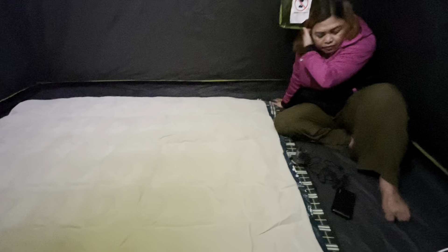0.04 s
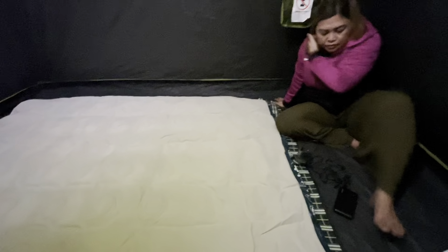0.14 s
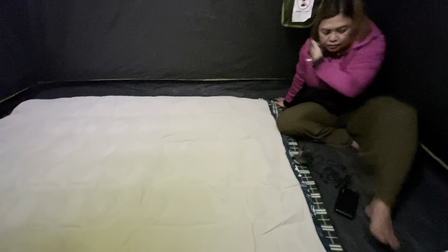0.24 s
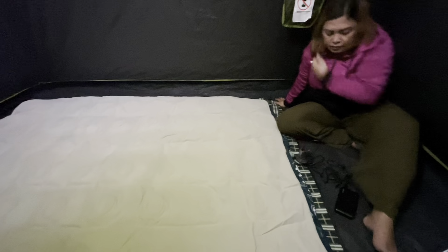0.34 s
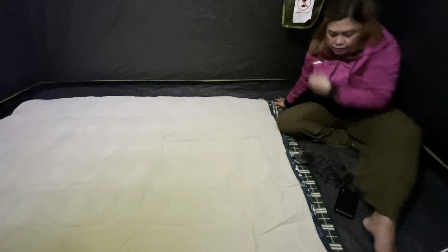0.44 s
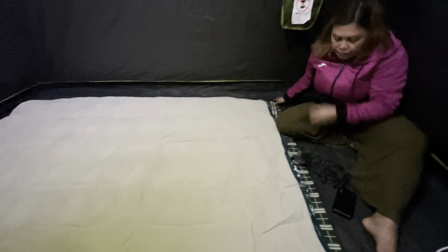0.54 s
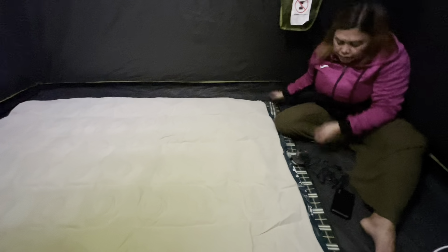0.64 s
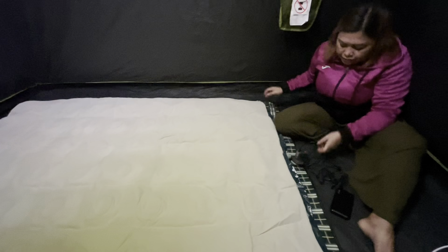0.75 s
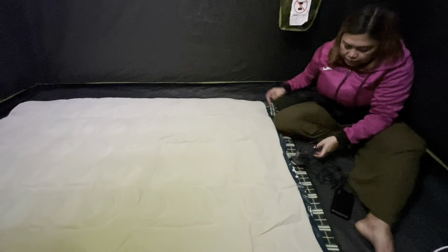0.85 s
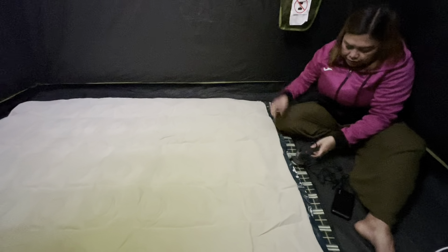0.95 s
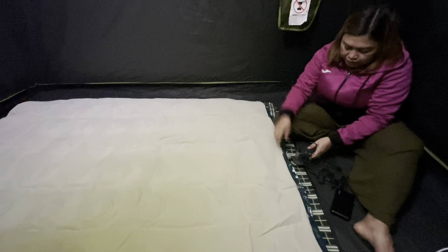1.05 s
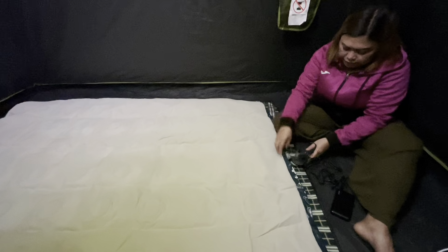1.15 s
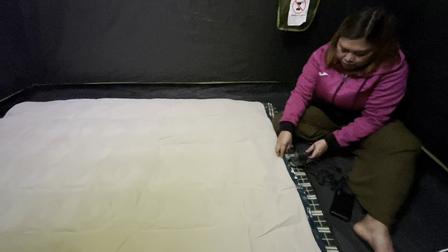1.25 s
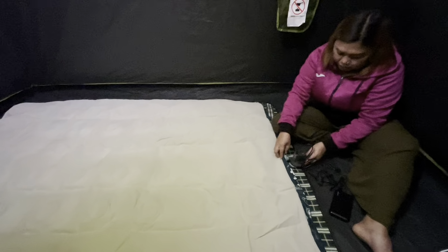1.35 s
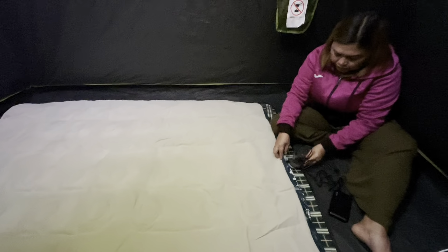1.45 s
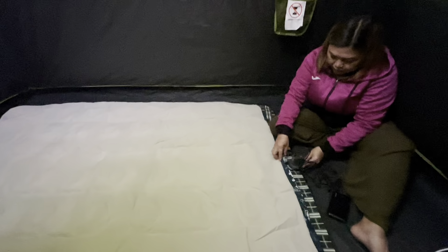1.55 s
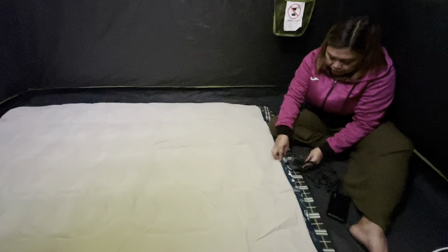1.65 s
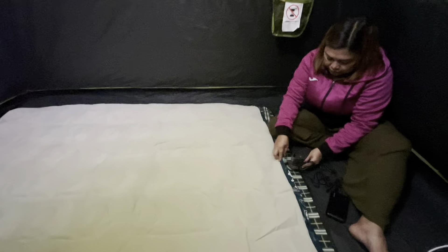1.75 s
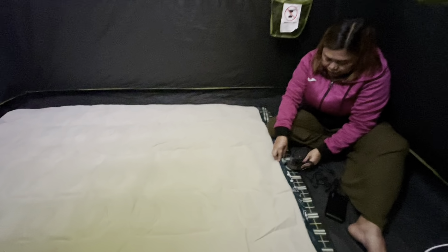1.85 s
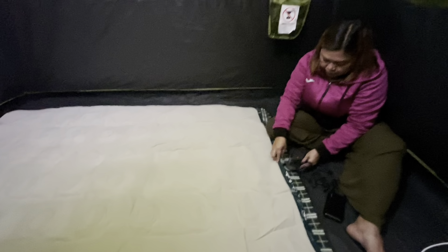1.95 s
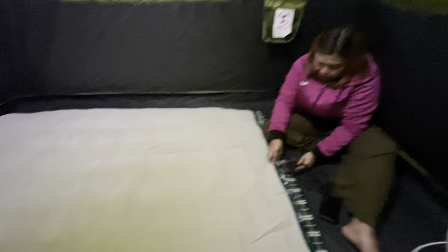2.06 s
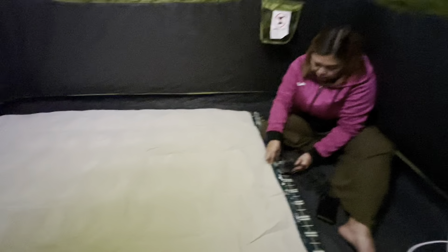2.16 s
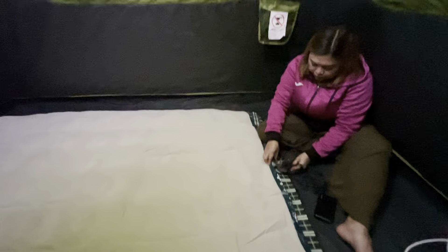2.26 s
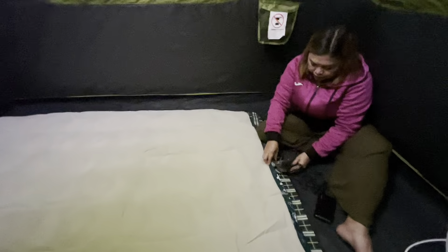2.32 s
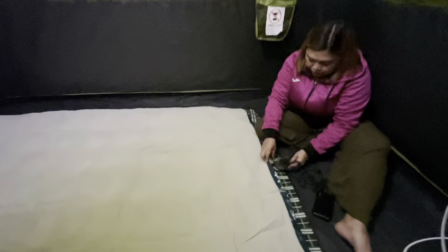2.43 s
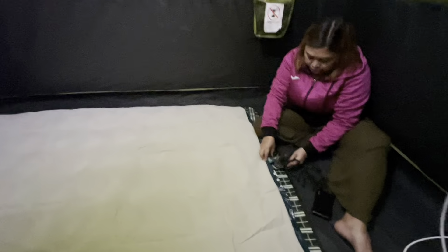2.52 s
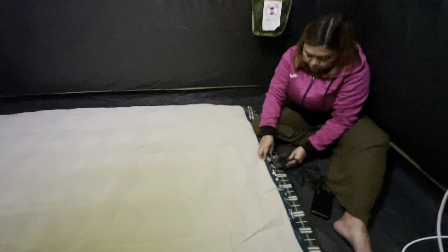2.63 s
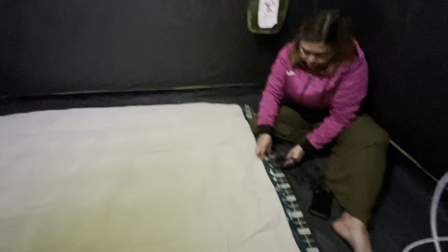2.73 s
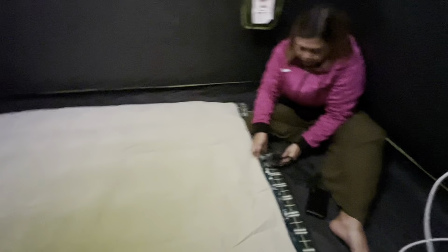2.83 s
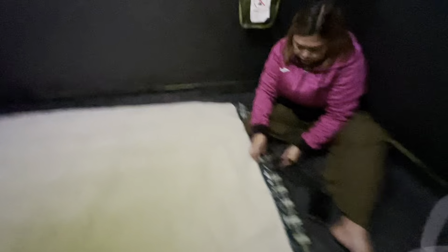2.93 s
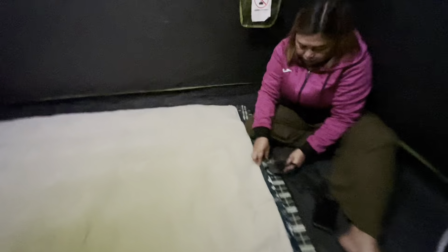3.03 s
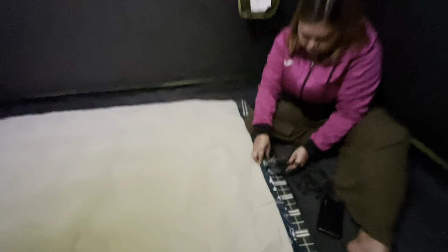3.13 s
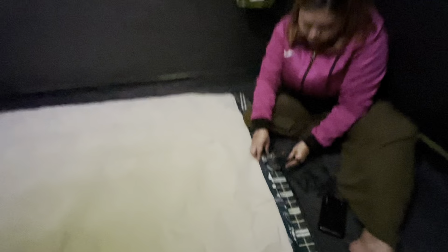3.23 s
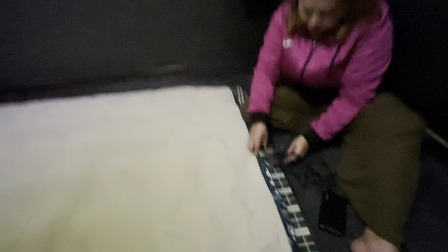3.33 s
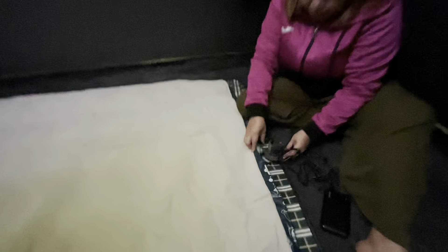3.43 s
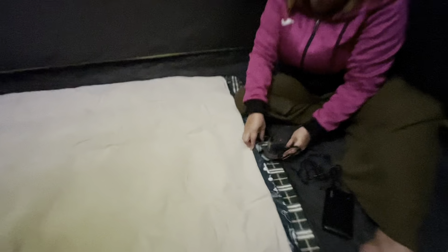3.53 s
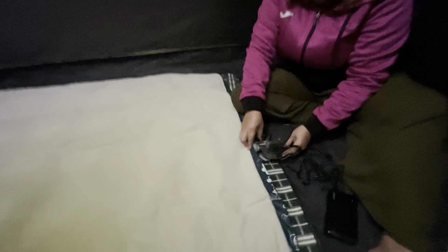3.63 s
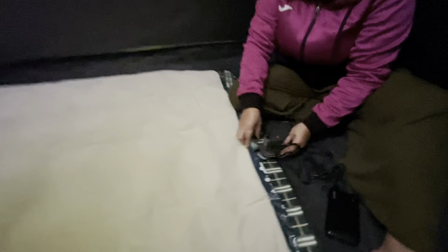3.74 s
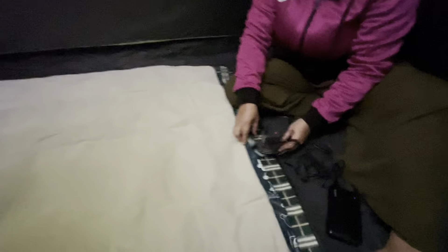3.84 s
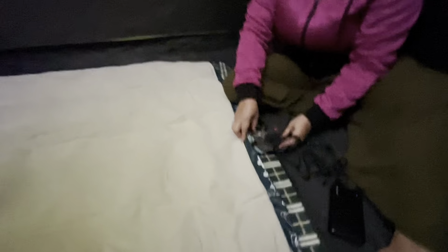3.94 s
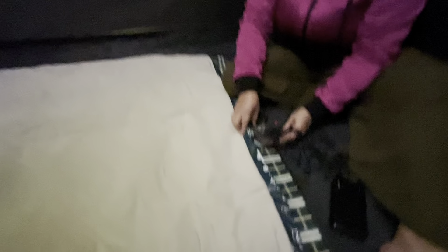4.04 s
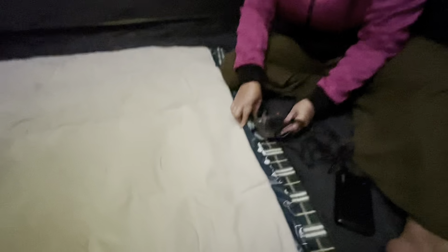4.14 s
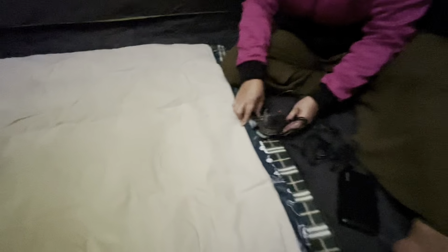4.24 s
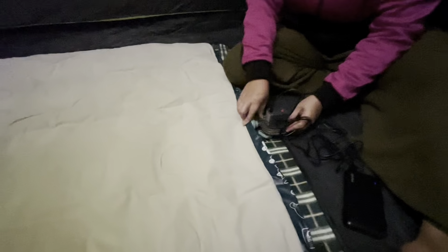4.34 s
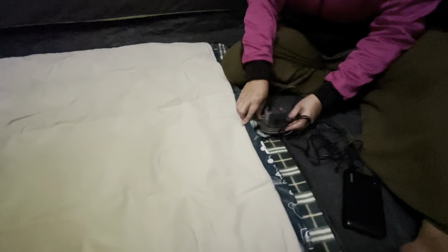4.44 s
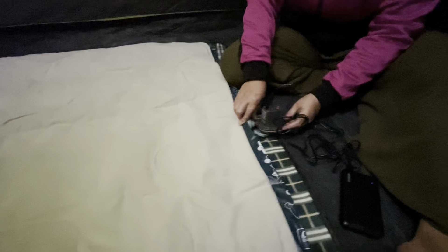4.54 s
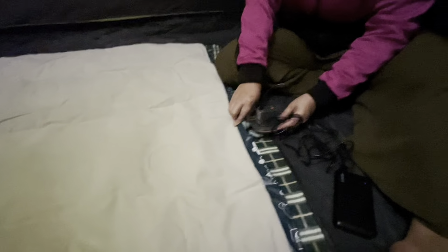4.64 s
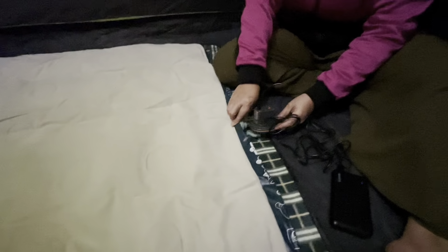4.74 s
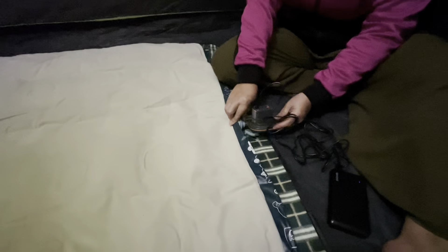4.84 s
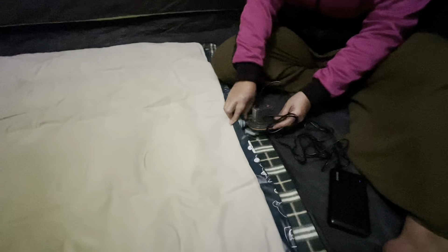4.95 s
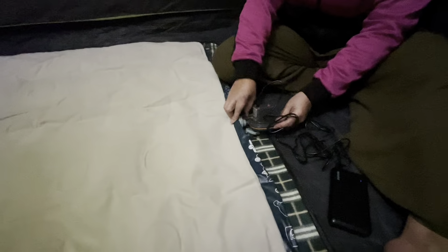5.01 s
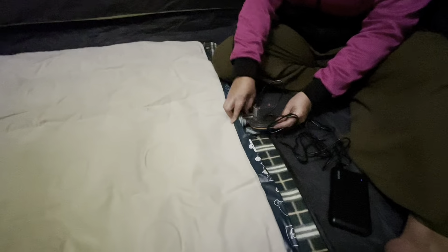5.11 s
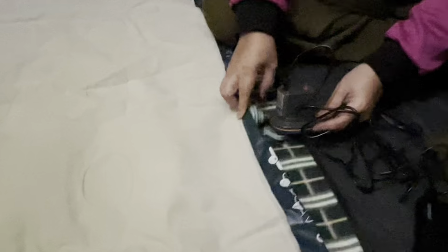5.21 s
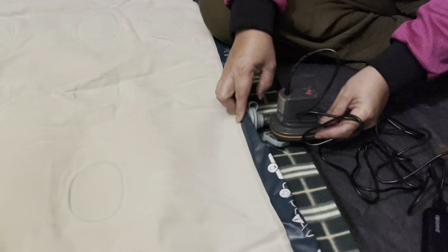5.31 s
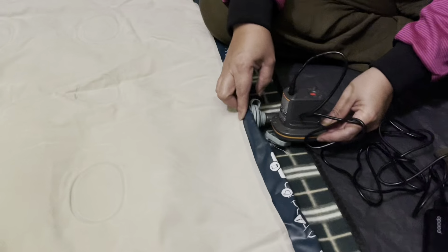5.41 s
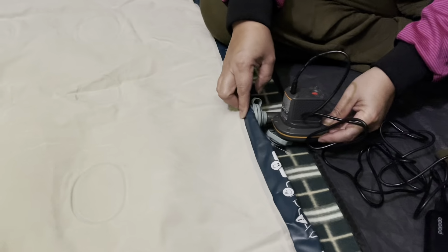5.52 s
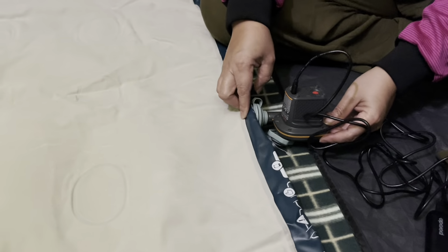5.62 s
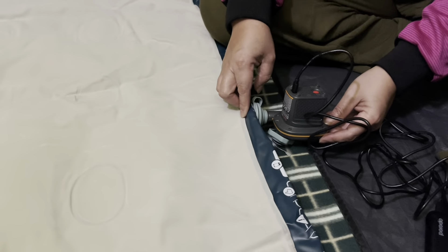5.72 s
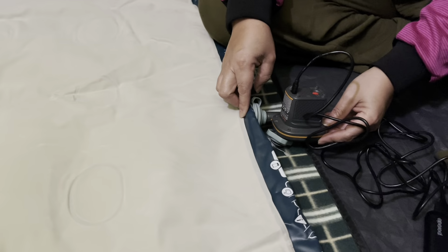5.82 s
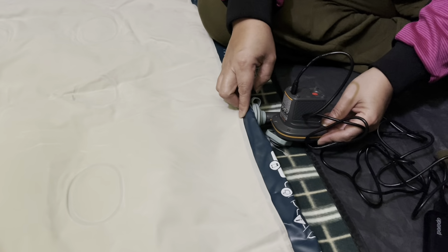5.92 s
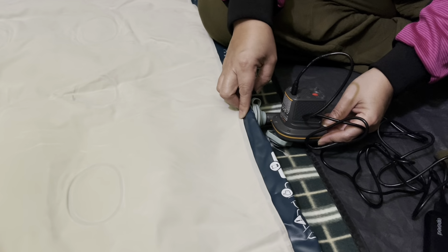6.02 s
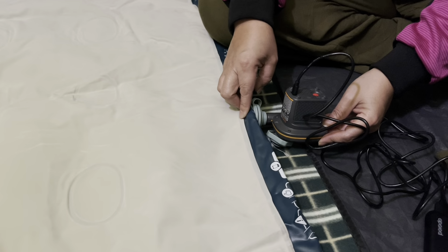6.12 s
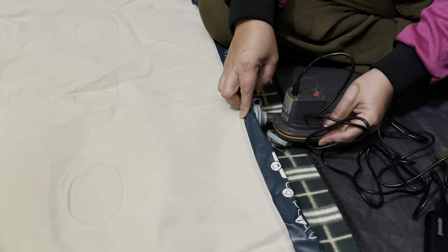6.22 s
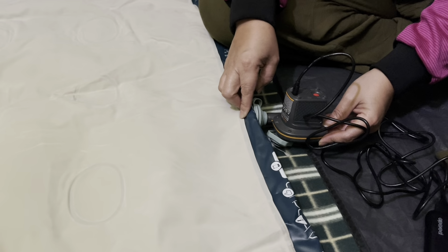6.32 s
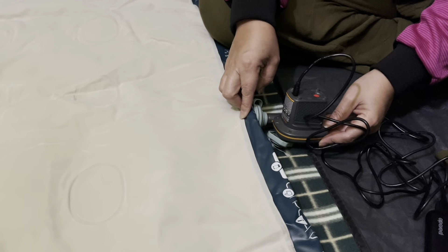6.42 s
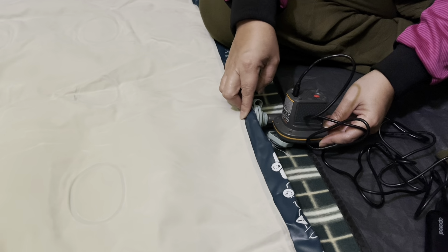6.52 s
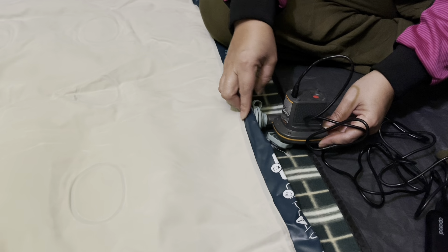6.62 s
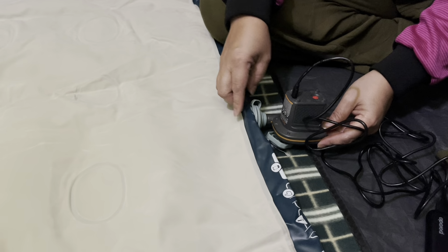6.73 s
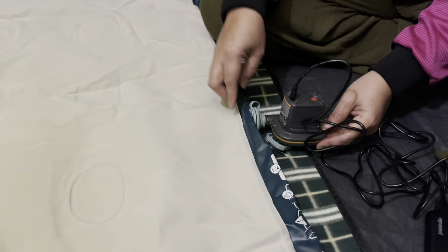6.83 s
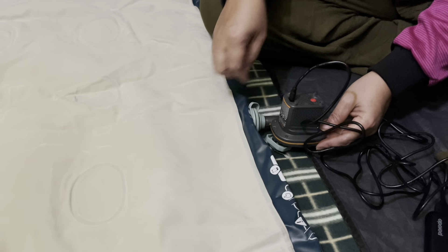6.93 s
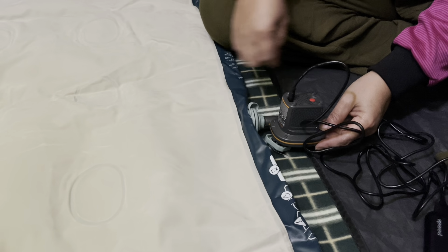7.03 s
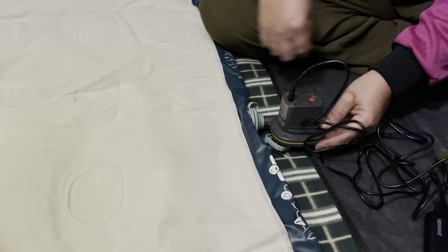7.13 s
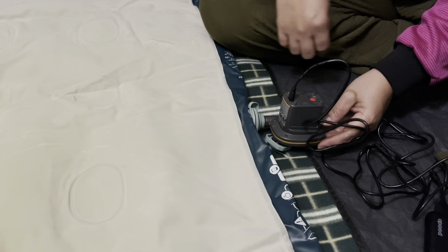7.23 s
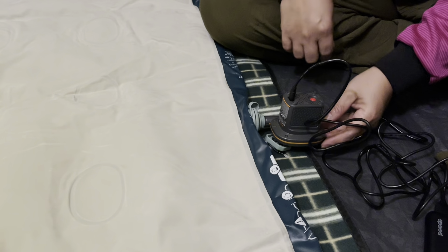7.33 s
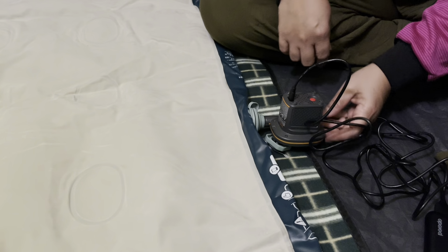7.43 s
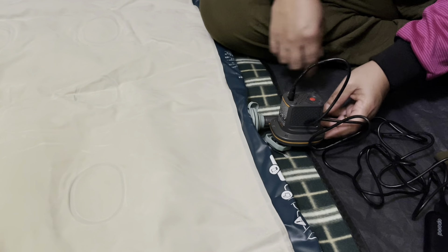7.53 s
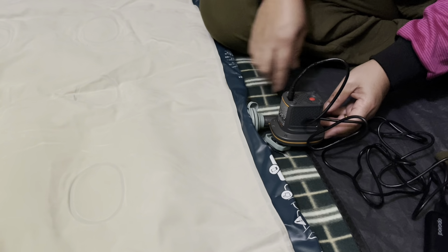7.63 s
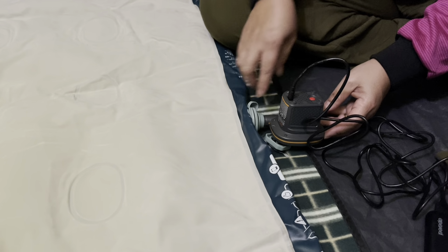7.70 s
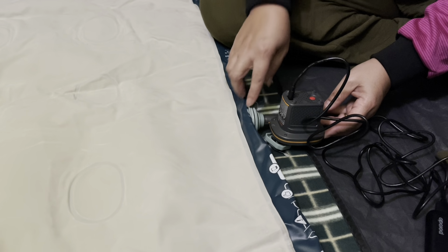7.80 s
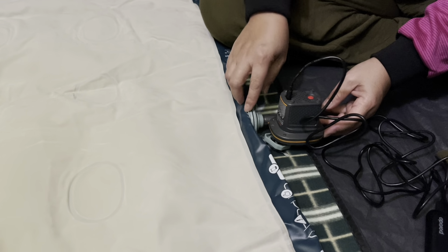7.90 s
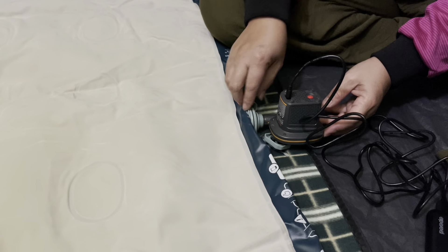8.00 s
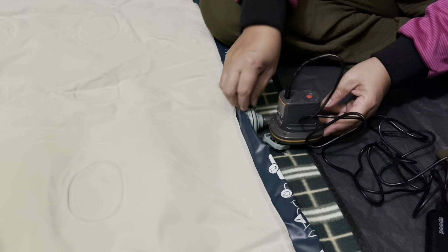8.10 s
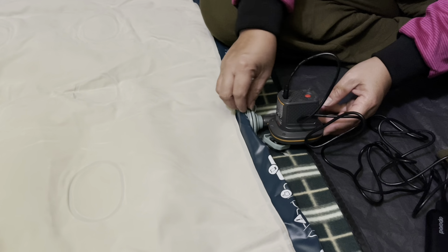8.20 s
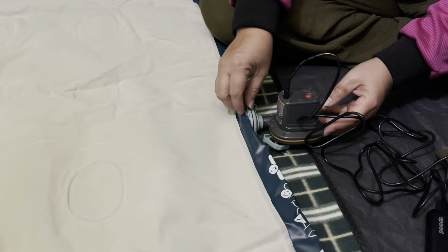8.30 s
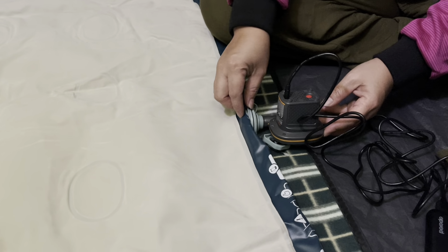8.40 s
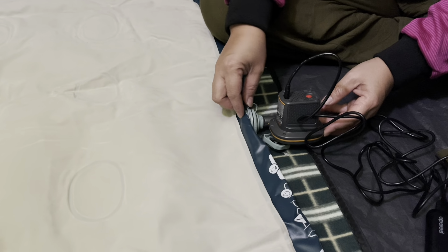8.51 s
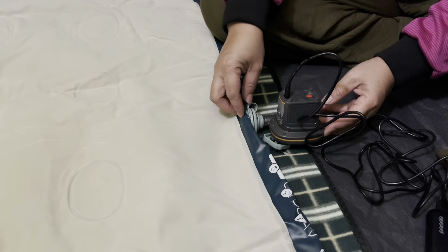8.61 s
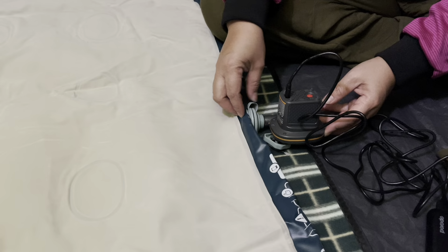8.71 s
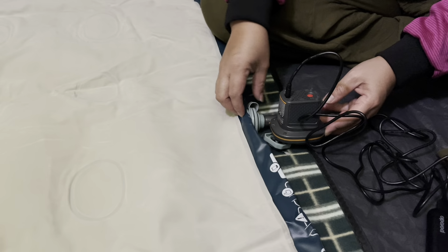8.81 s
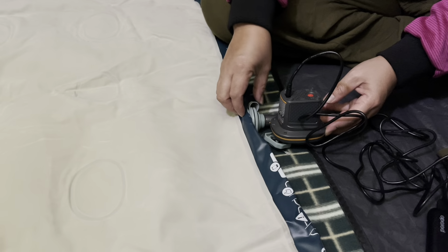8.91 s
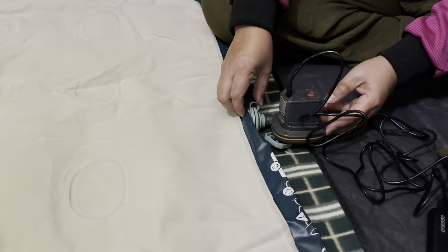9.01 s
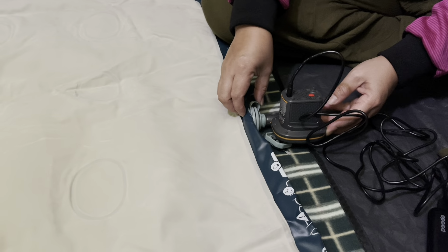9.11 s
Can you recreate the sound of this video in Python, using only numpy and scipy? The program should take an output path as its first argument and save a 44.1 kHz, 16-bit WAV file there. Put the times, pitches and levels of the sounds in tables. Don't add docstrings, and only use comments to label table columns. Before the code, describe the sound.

Continuous fan whine and broad airy rush from a small inflator on a tent floor, heard in stereo on a moving phone. It starts a little distant, with brief fabric rustle and faint mattress thumps, then comes closer, brighter and hissier. The pitch drops by about a tenth around the middle, climbs smoothly back, and continues running to the end over a faint low engine hum.

```python
import sys
import numpy as np
from scipy import signal
from scipy.fft import rfft, irfft, next_fast_len
from scipy.io import wavfile
from scipy.ndimage import uniform_filter1d, map_coordinates

SR = 44100
rng = np.random.default_rng(int(sys.argv[2]) if len(sys.argv) > 2 else 0)


def to_wav(s):
    ch = np.atleast_2d(s).T
    pcm = np.round(np.clip(ch, -1, 1) * 32767)
    wavfile.write(sys.argv[1], SR, pcm.astype(np.int16))


def nominal_scale(level):
    x = np.asarray(level, float) / 20
    return 10 ** x


N = 403956
SIDES = np.array([[1], [-1]])

# time in seconds, nearness from 0 to 1,
# travel in echo patterns per second, level of the minor multiples in dB.
PHONE_PATH = [(0, 0.2, 3.16, -40), (.8, 0.02, 2.68, -36), (1.6, 0.05, 2.66, -39), (2.4, 0.26, 2.78, -38),
              (3, 0.39, 7.7, -38.5), (3.6, 0.32, 6.36, -36), (4.2, 0.57, 4.02, -36),
              (4.8, 0.53, 5.16, -34.5), (5.3, 0.73, 3.53, -32.5), (5.8, 0.84, 1.02, -31),
              (6.4, 0.78, 0.93, -31), (7, 0.89, 1.9, -30), (7.6, 1, 0.35, -31.5), (8.4, 0.94, 0.32, -33.5),
              (9.16, 0.93, 0.42, -32)]
# time in seconds, speed in Hz.
SHAFT_SPEED = [(0, 298.9), (.25, 299.4), (.8, 298.5), (1.4, 299.2), (2.27, 302.3), (3.67, 303.5),
               (4.46, 302.8), (5.1, 282.9), (5.33, 286.1), (5.41, 286.4), (5.61, 279.7), (5.81, 269.2),
               (5.92, 266.9), (6.45, 273.4), (7, 289.4), (7.38, 295), (8.09, 297.4), (9.16, 299)]


def unit(x):
    return x / np.sqrt(np.mean(np.abs(x) ** 2) + 1e-20)


def along(points, hz):
    f, v = np.transpose(points)
    return np.interp(np.log(hz + 1), np.log(f + 1), v)


def curves(rows):
    s, *columns = np.transpose(rows)
    t = np.arange(N) / SR
    return [np.interp(t, s, column) for column in columns]


def wobble(rate):
    coarse_at = np.arange(0, N + 64, 64)
    coarse = map_coordinates(rng.standard_normal(400), [coarse_at * min(rate, 40) / SR])
    return np.interp(np.arange(N), coarse_at, coarse)


def swells(rows):
    s, db, width = np.transpose(rows)[..., None]
    t = np.arange(0, N + 64, 64) / SR
    bells = db * np.exp(-((t - s) / width) ** 2)
    return np.interp(np.arange(N) / SR, t, bells.sum(axis=0))


def filtered(x, response):
    m = next_fast_len(N + 8192)
    hz = np.fft.rfftfreq(m, 1 / SR)
    return irfft(rfft(x, m) * response(hz), m)[..., :N]


def rush(spectrum):
    points = spectrum + [(20000, -120)]
    return unit(filtered(rng.standard_normal(N), lambda hz: nominal_scale(along(points, hz))))


def shaft_angle():
    hz = uniform_filter1d(curves(SHAFT_SPEED)[0], size=SR // 10, mode="nearest")
    return 2 * np.pi * np.cumsum(hz + 0.1204 * wobble(25)) / SR


def load():
    free_hz, full_sag_hz = 297, 30
    return np.clip((free_hz - curves(SHAFT_SPEED)[0]) / full_sag_hz, 0, 1)


def blades(angle):
    # time in seconds, blade tone in dB,
    # second blade tone in dB, left-right difference from the phone's heading in dB.
    whine = [(0, -39.5, -58, 10), (.3, -38.5, -51, -1), (.66, -35.5, -47, -3), (.84, -38, -49, 6.5),
             (1.15, -37, -47, 2), (1.35, -38, -47, -8), (1.89, -39.5, -44, 0), (2.2, -48.5, -41.5, -13),
             (2.5, -36, -44.5, 0), (3.1, -39.5, -36, -1.5), (4, -35.5, -44, 8), (4.4, -40, -37, -6),
             (4.6, -35.5, -38.5, 7), (5, -37.5, -45, -10), (5.7, -31.5, -39.5, 1.5),
             (6.5, -31, -39.5, -4.5), (7.68, -31, -40, 2), (9.16, -37.5, -43.5, 15.5)]
    # time in seconds, change in dB,
    # half width in seconds, left-right swing in dB.
    blade_nulls = [(.15, -4.5, .08, 8), (2.73, -9, 0.15, -1), (2.88, -5, 0.071, -6), (3.3, -9, 0.043, -1),
                   (3.42, -20, 0.037, 4), (3.7, -17, 0.07, -1), (3.85, -23, 0.13, 9), (4.3, -3.5, 0.07, -4),
                   (4.8, -6, 0.075, 1), (5.74, 6, 0.065, -4), (5.9, -6.5, 0.23, 1), (6.2, -1.5, 0.19, 4),
                   (6.68, -4.5, 0.086, 3), (7.02, -6, 0.076, -3), (7.5, -7, 0.38, 12)]
    # time in seconds, change in dB, half width in seconds.
    second_nulls = [(.46, -4, 0.081), (.69, -12, .04), (.84, -8, 0.037), (1.02, -18, 0.053),
                    (1.22, -5, .03), (2.4, -7, 0.068), (2.65, -7, 0.045), (2.985, -26, 0.039),
                    (3.085, -5, .02), (3.24, -8.5, 0.16), (3.32, -34, 0.023), (3.47, -12, 0.032),
                    (3.57, -9, .04), (3.75, -8, 0.046), (4.23, -7, 0.075), (4.54, -12, 0.025),
                    (4.88, -10, 0.049), (5.27, -12, 0.05), (6.68, -7, .1), (7.09, -8, 0.09),
                    (3.14, 4, 0.024), (3.67, 4.5, .06), (3.87, -9, .04), (4.1, 3.5, 0.071),
                    (5.13, 3, 0.044), (5.71, 4.5, .07)]
    blade_db, second_db, pan_db = curves(whine)
    blade_db = blade_db + swells([(s, db, w) for s, db, w, _ in blade_nulls])
    pan_db = pan_db + swells([(s, swing, w) for s, _, w, swing in blade_nulls])
    second_db = second_db + swells(second_nulls)
    tone = nominal_scale(blade_db + SIDES * pan_db / 2) * np.sin(8 * angle + SIDES * 0.45)
    second_level = nominal_scale(second_db + SIDES * (1.2 + 1.5 * wobble(1.5)))
    second = second_level * np.sin(2 * 8 * angle + SIDES * 0.5 * wobble(0.8))
    return np.sqrt(2) * (tone + second)


def glints(k):
    # time in seconds, multiple of the shaft speed, change in dB,
    # half width in seconds.
    far_off = [(0.08, 18, 12.5, 0.09), (0.18, 20, 12, 0.3), (0.22, 13, 10.5, 0.27), (0.24, 5, -5, 0.46),
               (0.32, 17, -11.5, 0.068), (0.44, 14, -8.0, 0.2), (0.5, 21, -11.0, 0.085), (0.52, 7, 3, 0.36),
               (0.62, 15, 7, 0.2), (0.68, 18, -17.0, 0.04), (0.92, 19, -20, 0.18), (0.96, 10, -13, 0.11),
               (1.02, 11, -10, 0.2), (1.02, 14, 7, 0.22), (1.04, 17, -10, 0.3), (1.12, 9, -7, 0.49),
               (1.18, 7, -10.0, 0.2), (1.18, 24, -9.5, 0.28), (1.28, 18, 6.5, 0.29), (1.44, 12, -3, 0.17),
               (1.54, 14, -7.0, 0.26), (1.6, 6, 9.0, 0.1), (1.68, 10, 8, 0.26), (0.82, 21, 6, 0.075),
               (2.02, 21, -11.5, 0.09), (2.1, 19, 7, 0.11), (2.14, 18, -9.5, 0.13), (2.18, 17, 8, 0.22),
               (2.24, 10, -15, 0.11), (2.24, 15, -14, 0.33), (2.28, 7, -13, 0.3), (2.28, 9, 5.5, 0.55),
               (2.46, 12, 7, 0.079), (2.5, 9, -17, 0.077), (2.56, 17, -15, 0.082), (2.58, 10, 7, 0.09),
               (2.64, 10, -8, 0.32), (2.68, 13, -13.5, 0.04), (2.78, 18, -7, 0.64), (2.9, 6, -15, 0.27),
               (3.08, 17, 11, 0.023), (3.26, 7, 3, 0.7), (3.3, 18, 15, 0.04)]
    moving = [(3.4, 14, 5, 0.62), (6.45, 21, -6, 0.33), (3.6, 6, 8.5, 0.42), (3.68, 17, 2.5, 0.38),
              (3.69, 17, -14, 0.017), (4.74, 7, -5.5, 0.05), (3.86, 24, 7, 0.04), (3.8, 21, 9, 0.058),
              (3.88, 9, 7, 0.21), (3.88, 12, 3, 0.48), (5, 18, -10, 0.02), (3.9, 10, -6, 0.098),
              (4.08, 11, -13.0, 0.04), (4.2, 24, -10.5, 0.083), (4.22, 13, -20, 0.067),
              (4.32, 18, -17, 0.13), (4.34, 12, -18, 0.068), (4.42, 7, -5, 0.26), (4.46, 15, -18, 0.11),
              (4.66, 6, 7, 0.28), (4.68, 24, 12, 0.025), (4.74, 21, 5, 0.16), (4.78, 15, 10, 0.46),
              (4.82, 17, 2, 0.06), (4.88, 10, 7.5, 0.3), (4.88, 12, -17.0, 0.15), (4.92, 24, -11.5, 0.09),
              (4.98, 13, 6.5, 0.38), (5.0, 17, -6, 0.46), (5.1, 19, -5, 0.32), (5.12, 18, 5, 0.51),
              (5.16, 14, -13, 0.11), (5.16, 15, -14, 0.047), (5.46, 18, 7, 0.032), (5.24, 11, -11, 0.26),
              (5.28, 9, -19, 0.37), (5.32, 6, -4, 0.18), (5.44, 21, -19, 0.1), (5.46, 15, 11, 0.035),
              (5.5, 7, 4.5, 0.23), (5.58, 11, -16, 0.049), (5.62, 15, -13.0, 0.06), (5.78, 18, -13, 0.052),
              (5.94, 5, -14, 0.17)]
    close_by = [(5.98, 7, -8, 0.26), (6.04, 20, 7, 0.11), (6.06, 9, 11, 0.24), (6.5, 14, -5, 0.16),
                (6.14, 18, -10.5, 0.3), (6.04, 12, 6, 0.088), (6.32, 11, 4, 0.52), (6.32, 19, 7, 0.19),
                (6.4, 12, -24, 0.14), (6.48, 10, -11, 0.062), (6.5, 13, 6, 0.13), (6.52, 9, -12, 0.14),
                (6.56, 12, 0.5, 0.66), (6.35, 18, -7, 0.11), (6.9, 11, -19, 0.23), (6.92, 13, -14, 0.12),
                (6.94, 7, 6, 0.22), (6.96, 9, -21, 0.13), (6.96, 18, 8.5, 0.042), (7.06, 6, -13, 0.06),
                (7.1, 18, -15, 0.033), (7.1, 19, -7, 0.19), (7.12, 21, 5, 0.2), (7.2, 13, -15.0, 0.083),
                (7.1, 15, 7, 0.13), (7.28, 24, -9, 0.25), (7.3, 17, -10, 0.13), (7.42, 9, -10, 0.14),
                (7.48, 20, -6, 0.3), (7.5, 10, -23, 0.17), (7.74, 11, -14, 0.09), (7.74, 15, -18, 0.067),
                (7.92, 19, 11.5, 0.12), (8.02, 11, -15, 0.09), (8.24, 7, -5.5, 0.46),
                (8.32, 13, -13.0, 0.085), (8.34, 20, 6.5, 0.45), (8.38, 18, -9.5, 0.11), (8.58, 11, 7, 0.3),
                (8.9, 15, -15.0, 0.2), (8.92, 12, -16, 0.26)]
    low_and_quick = [(1.06, 4, 9.5, 0.34), (2, 1, 1, 0.18), (3.1, 2, 11, 0.35), (2.48, 3, 9, 0.12),
                     (4.3, 3, -13, 0.41), (6.3, 4, -8, 0.4), (3, 17, -6, 0.03), (3.23, 17, -6, 0.051),
                     (3.94, 17, 9, .045), (4.5, 17, -7, .07), (2.9, 12, 6.5, 0.075), (3.58, 12, -10, 0.049),
                     (2.7, 18, 2, .05), (3.5, 18, 4, .05), (2.7, 18, 5, .04), (4.78, 18, 8, 0.023),
                     (4.88, 18, -9, 0.027), (1, 32, 10.5, 0.49), (5.594, 32, 1, 0.35), (7.5, 32, 4.5, 0.75),
                     (6.8, 41, 19, .3), (4.665, 13, -16, 0.019), (4.86, 13, -18, 0.028),
                     (7.3, 18, -10, 0.014), (4.66, 21, -14, .015), (5.03, 21, -16, .02),
                     (6.75, 19, -10, .2), (4.52, 9, 3.5, .14), (4.16, 9, 4.5, 0.087), (3.49, 12, 7, .07),
                     (2.95, 12, 6, 0.03), (3.44, 18, -12, .05), (3.51, 15, -12, 0.038),
                     (3.32, 17, 9.5, 0.011), (3.7, 17, 5, .04)]
    rows = far_off + moving + close_by + low_and_quick
    own = [(s, lift_db, w) for s, which, lift_db, w in rows if round(which) == round(k)]
    return swells(own) if own else 0


def minor_orders(angle):
    # multiple of the shaft speed, far level in dB,
    # midway level in dB, near level in dB, change under full load in dB.
    minor = [(1, -12.5, -10.5, -13, -10), (2, -32.5, -30.5, -25, -10), (3, -21, -17, -25, -5),
             (4, -28, -28, -25.5, -3), (5, -13, -19, -18, -1), (6, -31, -20.5, -21.5, 3.5),
             (7, -18, -10, -11, -4.5), (9, -20, -10.5, -16, -15.5), (10, -18, -14.5, -14, -9.5),
             (11, -19.5, -16, -24.5, 0.3), (12, -11.5, -9, -14, -12.5), (13, -23, -11.5, -18, -0.5),
             (14, -24.5, -23.5, -24, 7.5), (15, -17, -20.5, -17.5, -1), (17, -15, -9.5, -18.5, -14),
             (18, -17.5, -18, -14, -6), (19, -20, -26, -30.5, 15.5), (20, -19, -33, -27.5, 1),
             (21, -19.5, -22.5, -26.5, -2.5), (22, -30, -32, -37, -4), (23, -26, -26.5, -33, 0),
             (24, -15, -18.5, -18, -14.5)]
    # multiple of the shaft speed, far level in dB, near level in dB.
    brush_orders = [(25, -30, -32), (26, -30, -32), (27, -28, -24), (28, -29, -28), (29, -28, -26),
                    (30, -25, -27), (31, -25, -24), (32, -22, -10), (33, -24, -27), (34, -26, -27),
                    (35, -24, -26), (36, -18, -25), (37, -24, -17), (38, -24, -19), (39, -27, -23),
                    (40, -34, -27), (41, -48, -33), (42, -31, -35)]
    midway, unsteady_db = 0.6, 3.5
    total, strain = np.zeros(N), load()
    near, _, level_db = curves(PHONE_PATH)
    for k, far_db, midway_db, near_db, load_db in minor:
        db = np.interp(near, [0, midway, 1], [far_db, midway_db, near_db])
        db = db + load_db * strain + glints(k)
        if 1 < round(k) < 5:
            db = db + unsteady_db * wobble(7)
        total += nominal_scale(db) * np.sin(round(k) * angle + rng.uniform(0, 2 * np.pi))
    for k, far_db, near_db in brush_orders:
        load_db = -18 if k < 33 else -2
        brushes = nominal_scale(load_db * strain + unsteady_db * wobble(8) - 2 + glints(k))
        distance = nominal_scale(far_db) * (1 - near) + nominal_scale(near_db) * near
        total += brushes * distance * np.sin(k * angle + rng.uniform(0, 2 * np.pi))
    return np.sqrt(2) * nominal_scale(level_db) * total


def air(angle):
    # frequency in Hz, level in dB per Hz.
    housing_far = [(300, -22), (400, -8), (540, -18), (880, 3.5), (1070, -6), (1300, -3), (1520, 0),
                   (1800, 1.5), (2200, -27), (2800, -7)]
    housing_near = [(300, -18), (400, -4.5), (600, -3.5), (830, 6), (1070, -13), (1300, 4), (1520, 6),
                    (1800, -0.5), (2200, -1), (2800, -34)]
    intake_far = [(1700, -29), (2200, 5.5), (2700, 1), (3700, 5.5), (4900, 2.5), (6000, -0.5), (7200, -1),
                  (9000, -16)]
    intake_near = [(1700, -22), (2300, -2.5), (3800, 10), (5000, 0), (5600, -12), (6100, -21), (6800, -5),
                   (9000, -20)]
    leak_colour = [(5000, -47), (6600, -17.5), (8500, -6.5), (9600, -2.5), (11300, -4.5), (12000, -12),
                   (12900, -23), (14000, -31)]
    boom_colour = [(150, -16.5), (205, -4.5), (245, 8), (275, -3.5), (330, -10.5), (420, -20)]
    # time in seconds, rise in dB, half width in seconds.
    spits = [
        (.2, 5, 0.4),
        (1, 5.5, 0.64),
        (1.6, 3.5, .1),
        (5.66, 3, 0.15),
        (6.85, 2, 0.14),
        (7.3, -4, 0.2),
        (8.3, -3, 0.18),
    ]
    # time in seconds, rise in dB, half width in seconds.
    heaves = [
        (1.2, 0.5, 0.14),
        (1.75, 4, 0.073),
        (2.75, 4, 0.19),
        (3.16, 3, .08),
        (3.68, 4, 0.22),
        (4.3, 2.5, 0.13),
        (5.31, 12, 0.037),
        (6.97, 4, 0.053),
        (7.65, 5.5, 0.13),
        (8.85, 3, .2),
    ]
    near, strain = np.clip(curves(PHONE_PATH)[0], 0, 1), load()

    def level(far_db, close_db, loaded_db):
        return far_db + close_db * near ** 2 + loaded_db * strain

    housing_db = level(-47, 4, -2.5) + 0.76 * wobble(8.1)
    intake_db = level(-50, 4.5, 0) + 0.72 * wobble(4.5)
    leak_db = level(-55.5, 15.5, 1) + swells(spits) + 1.2 * wobble(7)
    boom_db = level(-52, 2.5, -22) + swells(heaves) + 1.2 * wobble(12)
    housing = np.sqrt(1 - near) * rush(housing_far) + np.sqrt(near) * rush(housing_near)
    close = np.minimum(near / 0.9, 1) ** 3
    intake = np.sqrt(1 - close) * rush(intake_far) + np.sqrt(close) * rush(intake_near)
    flow = nominal_scale(housing_db) * housing + nominal_scale(intake_db) * intake
    leak = nominal_scale(leak_db) * rush(leak_colour)
    chop = 1 + 0.15 * np.sin(angle)
    return chop * (flow + leak) + nominal_scale(boom_db) * rush(boom_colour)


def cloth():
    # frequency in Hz, level in dB per Hz.
    fabric_colour = [(1500, -19), (3000, -4), (5500, -3), (8500, -0.5), (11300, 8), (12600, -5),
                     (13300, -13), (14500, -90)]
    peak_s, rise_s, fall_s = 0.08, 0.092, 0.24
    t = np.arange(N) / SR - peak_s
    shape_db = -10 * (t / np.where(t < 0, rise_s, fall_s)) ** 2
    return nominal_scale(-32 + np.maximum(shape_db, -120) + 0.57 * wobble(30.0)) * rush(fabric_colour)


def generator():
    # multiple of the engine speed, rms level in dB.
    firing = [(2, -52), (3, -61.5), (4, -82), (5, -70.5)]
    # frequency in Hz, level in dB per Hz.
    rumble_colour = [(20, -50), (38, -9), (55, 1.5), (110, -1.5), (170, -10), (300, -9), (600, -49),
                     (1200, -45)]
    engine_hz = 26
    angle = 2 * np.pi * np.cumsum(engine_hz + 0.19 * wobble(2.036)) / SR
    hum = np.zeros((2, N))
    for k, db in firing:
        hum += np.sqrt(2) * nominal_scale(db + 2.4 * wobble(3.1)) * np.sin(k * angle - 0.15 * SIDES)
    hum_level = nominal_scale(np.interp(curves(PHONE_PATH)[0], [0, 1], [-2, 2]))
    shared, *own = [rush(rumble_colour) for _ in range(3)]
    return hum_level * hum + nominal_scale(-52.5) * (shared + 0.45 * np.array(own))


def bumps():
    # time in seconds, peak level in dB, pitch in Hz, time to fade by 60 dB in seconds.
    knocks = [
        (2.09, -26.5, 286, 0.049),
        (2.241, -35, 220, .04),
        (2.7, -24, 269, 0.046),
        (2.779, -25, 298, 0.072),
        (2.86, -32, 315, 0.072),
        (6.606, -17, 1050, 0.007),
    ]
    out, t = np.zeros(N + SR), np.arange(SR // 5) / SR
    for s, db, hz, t60 in knocks:
        contact = 0.3 * rng.standard_normal(len(t)) * nominal_scale(-60 * t / 0.006)
        ring = np.sin(2 * np.pi * hz * t) + contact
        attack = 1 - np.exp(-t * hz * 0.58)
        out[round(s * SR):][:len(t)] += nominal_scale(db - 60 * t / t60) * attack * ring
    return out[:N]


def tent(tones, noise, width_hz):
    # frequency in Hz, level in dB.
    walls_db = [(100, -8), (400, -6), (700, 0), (1500, 1), (8500, 4.5), (9300, -5), (9800, -26)]
    # frequency in Hz, level in dB.
    flicker_db = [(300, -21), (1200, -10), (2000, -1), (8000, 4), (9800, -5)]
    # frequency in Hz, depth in dB.
    patchy_db = [(1500, .8), (3000, 1.8), (6000, 2.6), (9000, 1.5), (12000, 5)]
    hz, t, (z_tones, z_noise) = signal.stft([tones, noise], SR, nperseg=2048, noverlap=1024)
    near, travel, _ = curves(PHONE_PATH)
    at = np.minimum((t * SR).astype(int), N - 1)
    place = 2.5 * (np.cumsum(np.abs(travel)) / SR)[at]
    grid = np.meshgrid(hz / width_hz, place, indexing="ij")

    def echo_pattern(real, imaginary):
        return map_coordinates(real, grid, order=1) + 1j * map_coordinates(imaginary, grid, order=1)

    both, apart = [echo_pattern(*pair) for pair in rng.standard_normal((2, 2, 300, 80))]
    patches = uniform_filter1d(rng.standard_normal(z_noise.shape), size=12, axis=0)
    patches = uniform_filter1d(patches, size=5, axis=1)
    z_noise = z_noise * nominal_scale(along(patchy_db, hz)[:, None] * unit(patches))
    flicker = nominal_scale(along(flicker_db, hz)[:, None]) * np.clip(0.2 * travel[at], 0, 1.1)
    middle_tones = z_tones * (1 + 0.48 * flicker * both)
    middle_noise = z_noise * (1 + 0.71 * np.minimum(flicker, 1) * both)
    middle = middle_tones + middle_noise
    side = nominal_scale(along(walls_db, hz)[:, None] - 9.1 * near[at]) * apart * (z_tones + z_noise)
    left_right = np.array([middle + side, middle - side])
    return signal.istft(left_right, SR, nperseg=2048, noverlap=1024)[1][:, :N]


def scene():
    angle = shaft_angle()
    scattered = tent(minor_orders(angle) + cloth(), air(angle), width_hz=70)
    return blades(angle) + scattered + bumps() + generator()


def low_pass(x):
    return signal.sosfilt(signal.butter(12, 12920, fs=SR, output="sos"), x)


def record(dry):
    # frequency in Hz, turn in half turns.
    port_turn = [(8600, 0), (9550, .67), (9900, .86), (10250, 1), (11000, 1.5), (11750, 1.85)]
    # frequency in Hz, left-right difference in dB.
    port_tilt = [(60, 1.5), (200, 2.5), (640, 4.5), (1160, 6.5), (2090, 2), (3770, -0.5), (6820, 7.5),
                 (9000, -1.5)]

    def ports(hz):
        tilt_db = along(port_tilt, hz) * (hz < 9000)
        turn = np.exp(-0.5j * np.pi * SIDES * along(port_turn, hz))
        return nominal_scale(SIDES * tilt_db / 2) * turn

    mix = filtered(dry, ports)
    return low_pass(mix)


dry = scene()
out = record(dry)
to_wav(out)
```